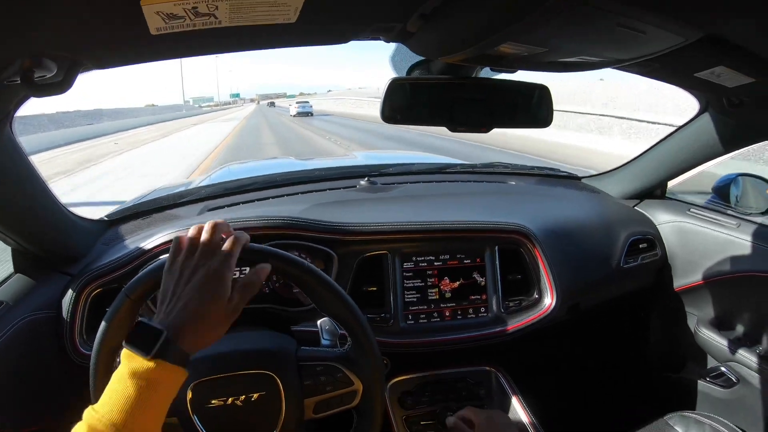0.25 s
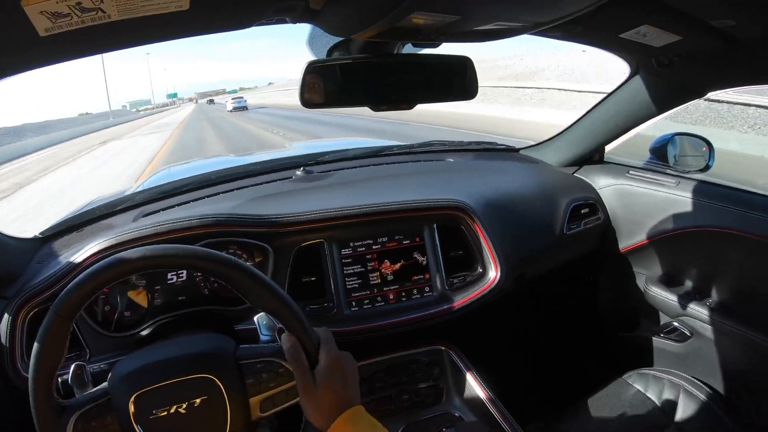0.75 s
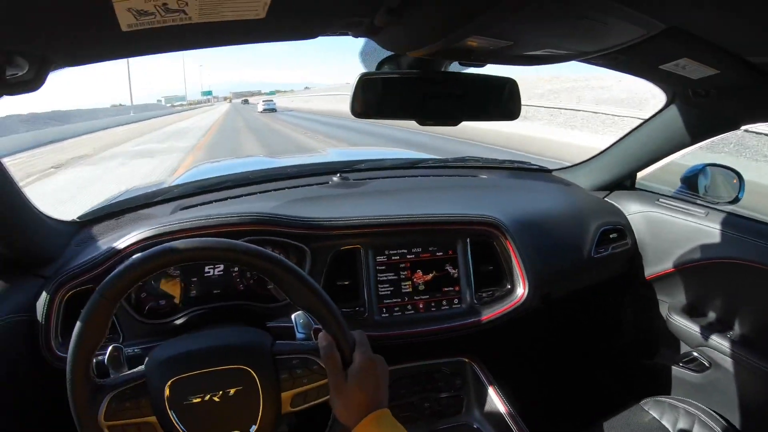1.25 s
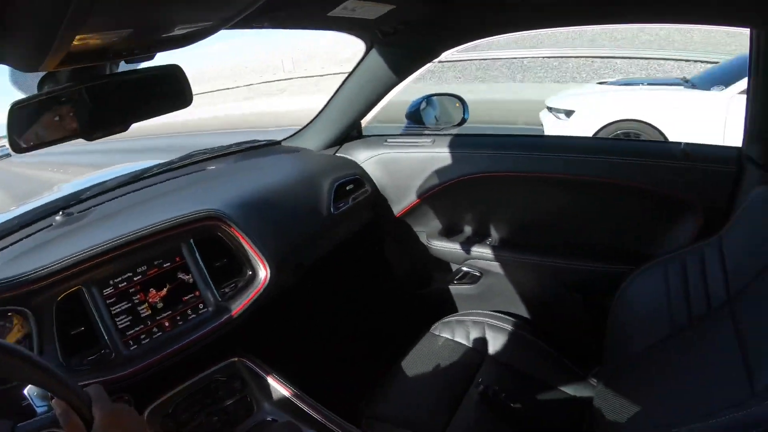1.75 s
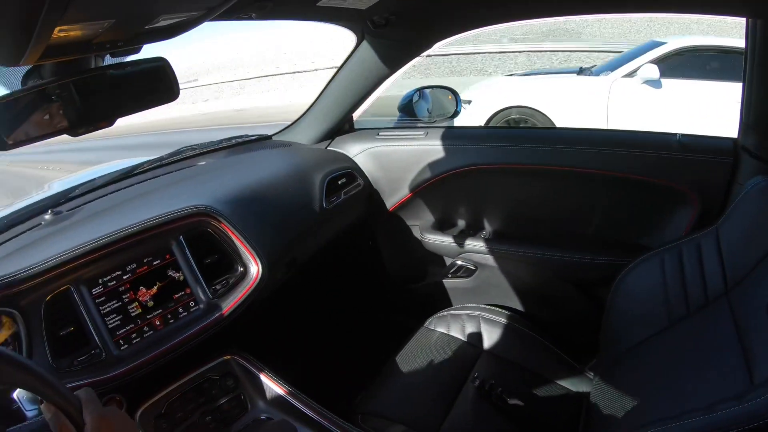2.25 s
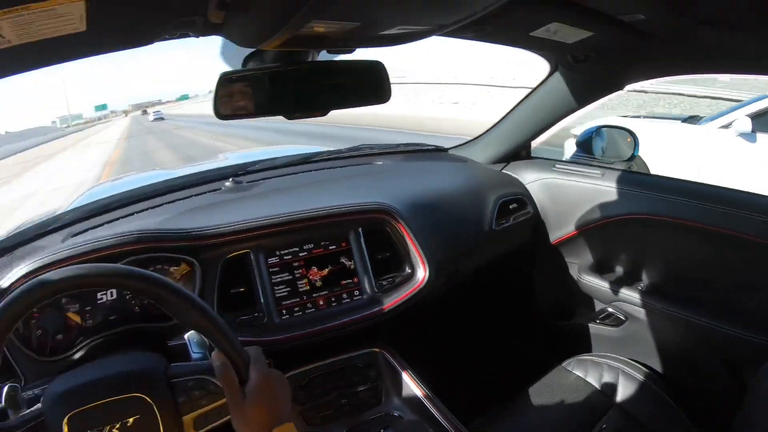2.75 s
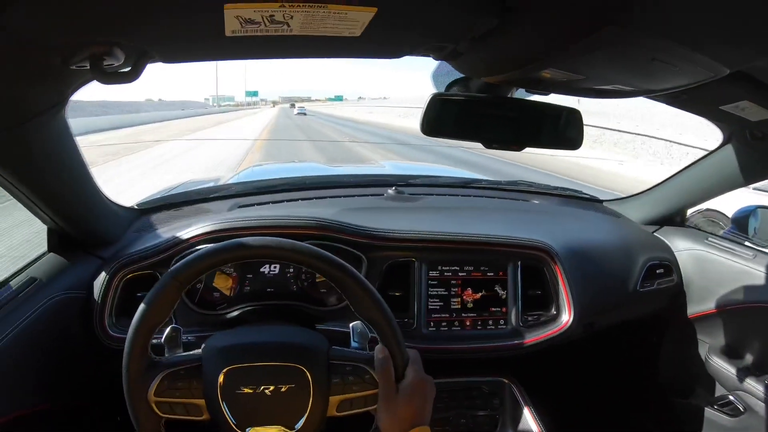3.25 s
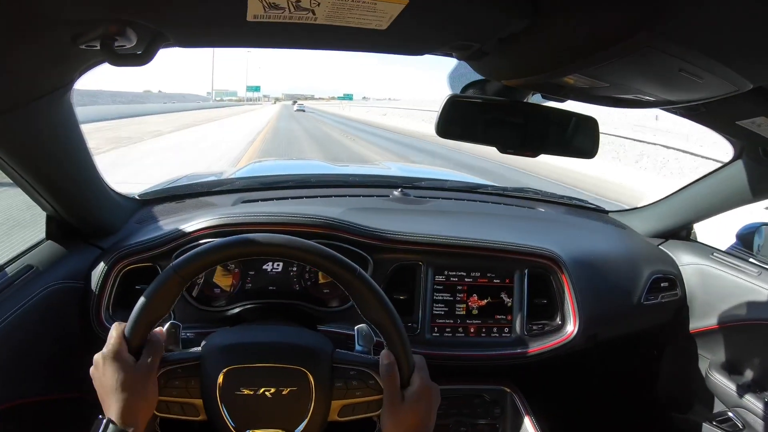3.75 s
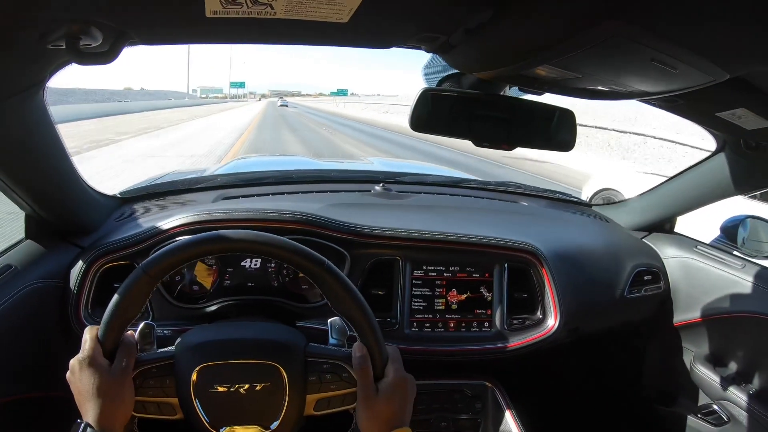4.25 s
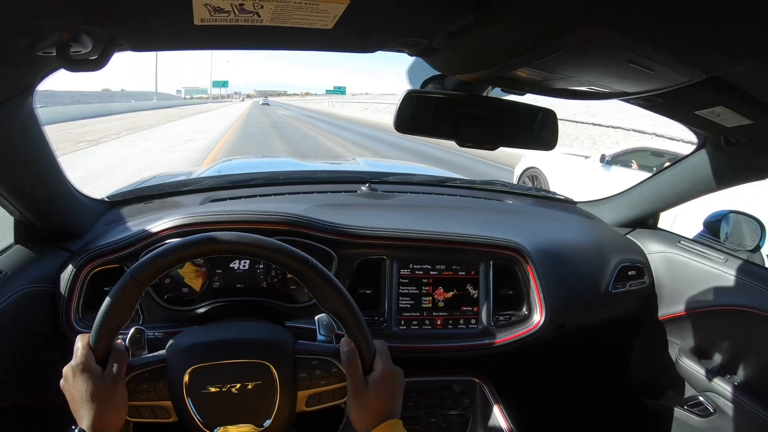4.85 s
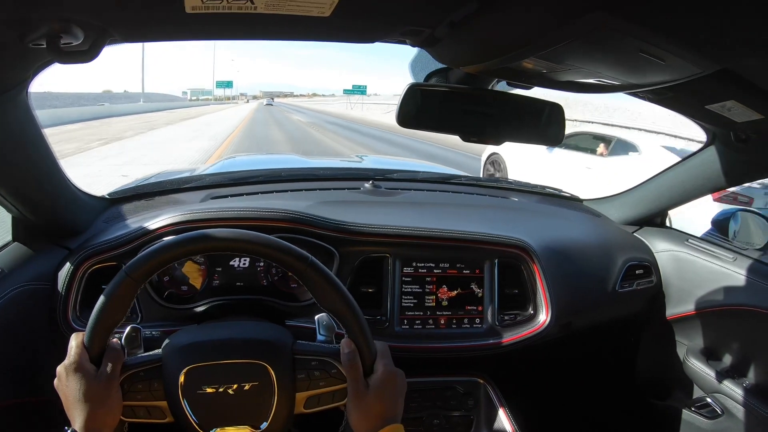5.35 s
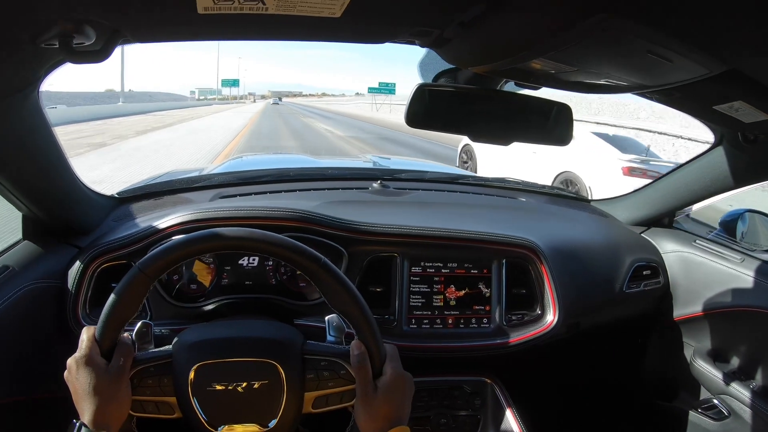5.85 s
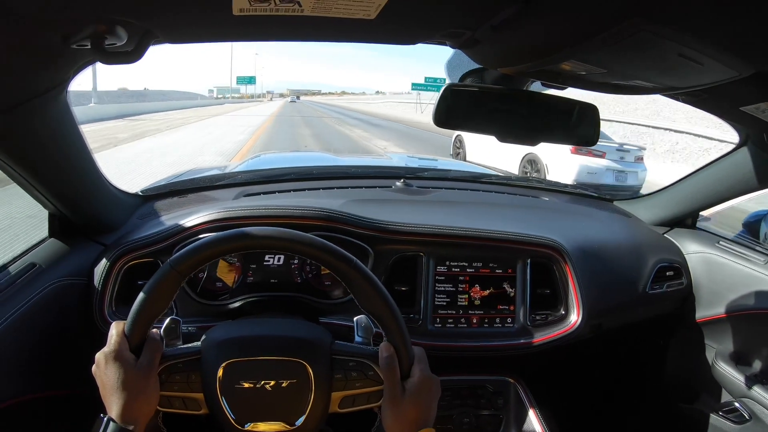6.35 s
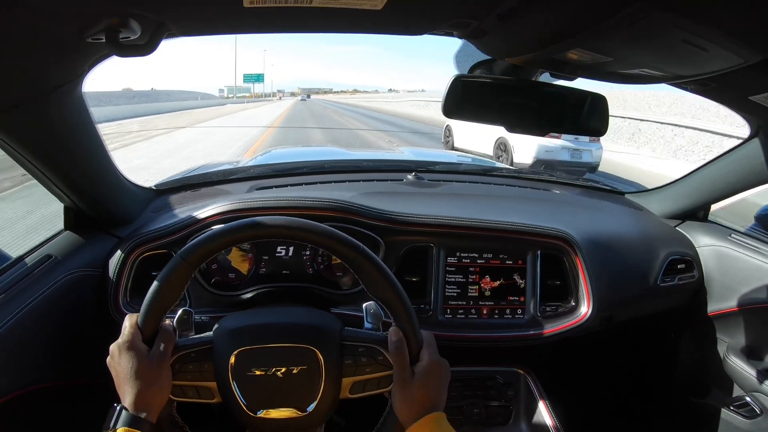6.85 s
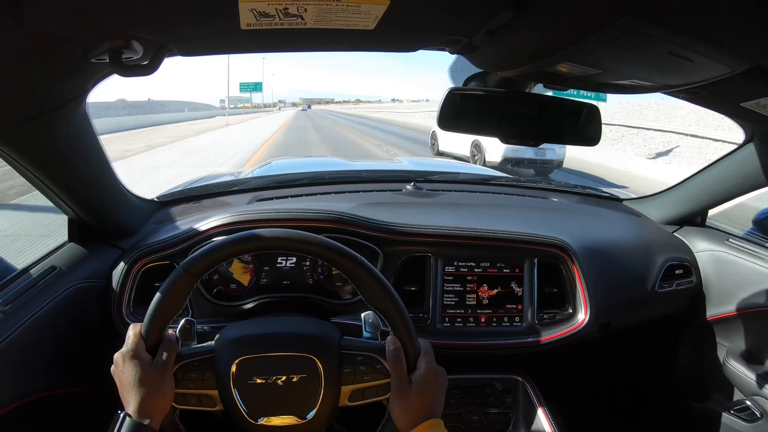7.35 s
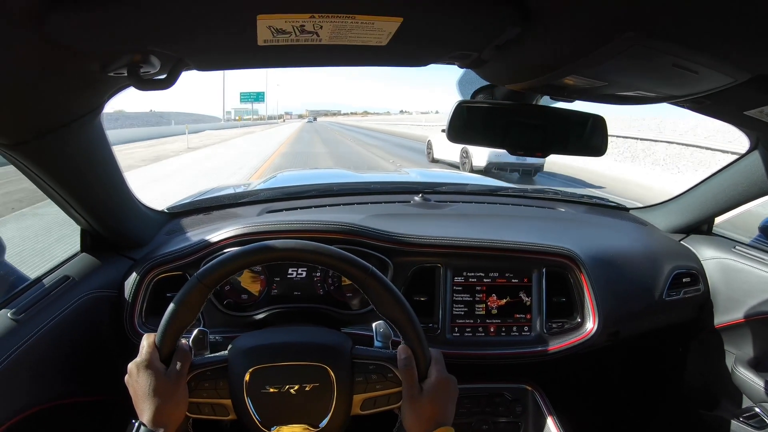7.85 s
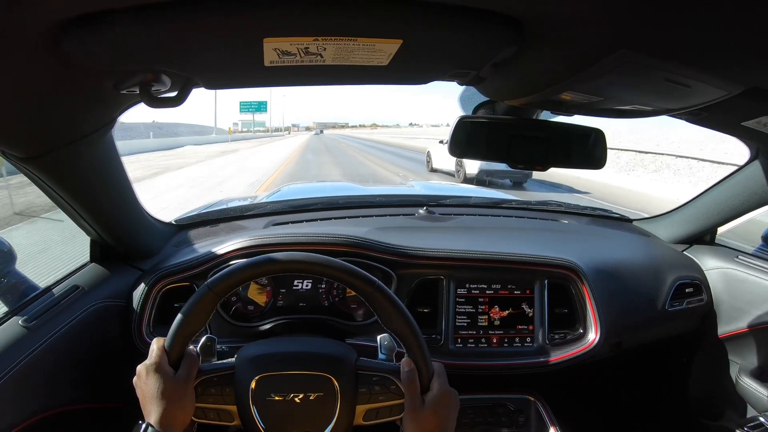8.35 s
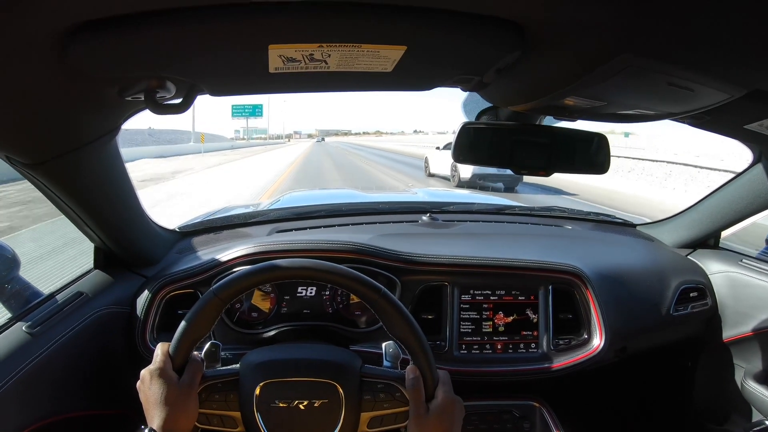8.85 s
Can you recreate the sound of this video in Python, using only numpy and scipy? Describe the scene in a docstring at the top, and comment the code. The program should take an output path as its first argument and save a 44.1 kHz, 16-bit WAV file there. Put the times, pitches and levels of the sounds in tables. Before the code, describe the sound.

Inside a V8 car cruising over road rumble, a second V8 growls past on the right, then the driver's own engine accelerates.

```python
"""Inside a closed V8 car on a highway. At first its engine coasts over road rumble and tyre roar.
A second V8 blips its throttle near 1.6 s, pulls alongside on the right and draws ahead by 6 s; its
uneven exhaust pulses growl, snarl and hiss. Then the driver's own engine kicks down a gear and
drones higher, its firing booming in the cabin. Near 8 s the other driver lifts off the throttle."""
import sys
import numpy as np
from scipy import signal
from scipy.io import wavfile
from scipy.ndimage import uniform_filter1d

SR = 44100
rng = np.random.default_rng(int(sys.argv[2]) if len(sys.argv) > 2 else 0)


def generate_wav(sig):
    """Save sig (samples, or channels by samples) to the path in sys.argv[1] as 16-bit PCM at SR."""
    pcm = np.round(np.clip(np.atleast_2d(sig).T, -1, 1) * 32767).astype(np.int16)
    wavfile.write(sys.argv[1], SR, pcm)


N = 401310
TIME = np.arange(N) / SR

# How loud the road is: (time [s], rumble [dB], body boom [dB], tyre roar [dB])
ROAD_LEVELS = [(0, -23.5, -29.5, -39), (.5, -22.5, -28, -36), (.9, -20.5, -31, -34.5),
               (1.5, -23.5, -28.5, -32), (1.8, -25, -25, -34.5), (2.1, -22, -30.5, -34.5),
               (2.7, -20, -30.5, -33), (3.4, -22, -29.5, -34), (4.0, -25, -35, -35.5),
               (4.75, -27.5, -36, -43), (5.4, -26.5, -27, -41), (6.2, -21, -38.5, -47),
               (6.8, -33.5, -37, -45), (7.5, -28, -35.5, -42.5), (7.95, -27, -33.5, -42.5),
               (8.4, -21, -29.5, -42.5), (8.65, -23, -26.5, -39.5), (9.1, -21.5, -39, -42)]
# The colour (low-to-high balance) of each road noise: (frequency [Hz], relative level [dB])
RUMBLE_COLOUR = [(9.4, -28.5), (16, 1.5), (32, 4), (59, -6), (108, -3.5), (146, -5.5), (161, -13),
                 (184, -7.5), (230, -8.5), (300, -41), (510, -120)]
BOOM_COLOUR = [(88, -31), (150, -3.5), (199, -8), (313, -12), (365, -13.5), (467, -27.5), (571, -41),
               (650, -23.5), (840, -54.5), (1430, -120)]
ROAR_COLOUR = [(330, -34.5), (560, -5.5), (640, -12.5), (834, 1), (887, 0), (983, -3.5), (1130, -7),
               (1350, -11), (1900, -16.5), (2470, -36.5), (4180, -120)]
# How alike noise is in the two ears: (frequency [Hz], likeness [-1 opposite to 1 same])
EAR_LIKENESS = [(60, 0.99), (130, 0.99), (260, 1), (550, 0.91), (1150, 0.41), (2100, 0.64), (3200, 0.97),
                (4300, 0.84), (5600, -0.16), (10500, -0.32)]
# Which ear hears more noise: (frequency [Hz], left minus right [dB])
EAR_LEAN = [(60, -0.5), (110, -0.5), (190, 1.5), (340, 0.5), (600, -2), (1060, -5.5), (1880, -3.5),
            (3330, -3.5), (5920, -4.5), (10500, -1.5)]
# How the cabin passes tones from the right: (frequency [Hz], left minus right [dB], left lead [rad])
CABIN_PATH = [(60, -0.5, 0), (250, -2, -.22), (400, 0, -.3), (500, -2, -.5), (630, -4.5, -.7),
              (800, -8, -1.8), (1000, -6, -2.7), (1160, -4, -5.0), (1350, -8, -5.7), (1700, -9, -6.1),
              (2100, -3, -5.4), (2700, -5, -6.4), (3600, -4, -5.8)]

# Our engine coasts, kicks down and pulls: (time [s], firing rate [Hz], firing tone [dB])
OWN_FIRING = [(0.0, 111.5, -23.5), (1.6, 108, -22.5), (2.3, 105.5, -29.5), (3.0, 103.9, -24),
              (3.83, 100.8, -28), (4.61, 100.6, -25), (4.91, 100.7, -20), (5.9, 102.9, -17),
              (6.08, 106.6, -17.5), (6.21, 110, -15.5), (6.33, 124.3, -15.5), (6.45, 135.1, -11.5),
              (6.82, 139.5, -11.5), (8.56, 154.7, -16.5), (8.85, 157.5, -14), (9.1, 158.2, -14.5)]
# Its side tones: (pitch [x firing rate], level coasting [dB], level pulling [dB])
OWN_SIDE_TONES = [(.5, -32, -39.5), (.75, -30.5, -34.5), (1.25, -30, -34.5), (1.5, -41.5, -40),
                  (1.75, -35, -47.5), (2, -36.5, -41.5), (3, -44, -41.5), (4, -54, -48.5)]
# Our throttle: (time [s], opening [0 to 1])
OWN_THROTTLE = [(0, 0), (4.3, 0), (6.4, 1), (9.1, 1)]

# Where the other car is: (time [s], place [0 alongside to 1 ahead])
OTHER_PLACE = [(0, 0.035), (4.4, 0), (6.2, 1), (9.1, 1)]
# Its engine speed, with eight firings in each cycle: (time [s], cycle rate [Hz])
OTHER_REVS = [(1.5, 29.6), (1.6, 33.5), (1.7, 32.3), (1.77, 34.8), (1.84, 33.3), (2.41, 32.6), (3.15, 31.2),
              (3.83, 31.2), (4.38, 31.35), (5.48, 32.7), (5.84, 33), (7, 34.1), (7.4, 36.3), (7.9, 30.4),
              (8.05, 31), (8.72, 30.6), (9.1, 31.6)]
# Its exhaust hiss, a lower rasp and a higher sizzle: (time [s], rasp [dB], sizzle [dB])
HISS_LEVELS = [(0.0, -41.5, -63.5), (0.5, -38.5, -61), (0.88, -38, -60), (1.0, -42.5, -66),
               (1.18, -43, -63.5), (1.4, -39, -58), (1.9, -42, -51), (3.1, -43, -54), (4.12, -43, -58.5),
               (4.17, -38, -50), (4.4, -38.5, -48), (4.95, -45, -45), (5.3, -42, -39.5), (5.6, -43.5, -40),
               (5.95, -34, -37.5), (6.25, -42, -42.5), (6.62, -41, -46), (6.8, -44.5, -51),
               (7.3, -45, -53.5), (8.1, -50.5, -63), (8.3, -47.5, -60.5), (9.1, -50.5, -67.5)]
# Their colours with the car alongside and ahead: (frequency [Hz], relative level [dB])
RASP_BESIDE = [(940, -34), (1600, -1.5), (1930, 0.5), (2100, -1.5), (2230, -1), (2680, -10), (2970, -9.5),
               (3900, -19), (5070, -44.5), (8580, -120)]
RASP_AHEAD = [(940, -41.5), (1600, -8), (2180, -25.5), (2460, -5), (2540, -2), (2640, -1.5), (3110, -19.5),
              (3590, -23), (3900, -17), (5070, -51.5), (8580, -120)]
SIZZLE_BESIDE = [(2060, -30.5), (3500, -1), (3760, -5.5), (3960, -2), (4300, -4), (5380, 1), (6270, 2),
                 (6790, -1), (7580, 2), (9720, -9.5), (11000, -33.5), (14200, -45.5), (22000, -120)]
SIZZLE_AHEAD = [(2060, -31.5), (3500, -5), (4300, -8), (5000, -4), (5500, 0.5), (6300, -1), (7000, -4),
                (9720, -9.5), (11000, -29), (14200, -45.5), (22000, -120)]
# Extra hiss as its driver works the throttle: (start [s], length [s], rasp [dB], sizzle [dB])
HISS_BURSTS = [(1.547, 0.27, 7.5, 6.5), (7.411, 0.529, 7.5, 11), (8.353, 0.45, 5, 9.5)]
# Thin whistles in the hiss: (frequency [Hz], width [Hz], relative level [dB])
WHISTLES = [(2621.7, 100, 1), (3190, 60, -14), (4050, 80, -14), (5454, 160, -15), (6150, 200, -16)]
# The whistles come up once the car is ahead: (time [s], level [dB])
WHISTLE_LEVEL = [(5.2, -58), (5.9, -44), (6.55, -38), (6.9, -44.5), (7.35, -46), (7.6, -37.5), (8.0, -54),
                 (8.4, -48), (8.7, -48.5), (9.1, -59)]
# Its four groups of tones, low to high: (time [s], firing [dB], growl [dB], snarl [dB], buzz [dB])
OTHER_LEVELS = [(1.42, -66, -72, -68, -75), (1.66, -23, -25.5, -41, -59), (1.8, -31, -39, -55, -58),
                (2.2, -35, -35, -55, -53), (2.92, -32, -31.5, -48, -50), (3.1, -28, -31, -42, -55),
                (3.5, -17.5, -33.5, -41.5, -57), (3.9, -18, -30.5, -34, -54),
                (4.22, -16, -24, -29.5, -42.5), (4.8, -17, -24.5, -25.5, -39),
                (5.1, -20.5, -23, -26.5, -31.5), (5.4, -21, -26, -26, -33), (5.8, -20.5, -22.5, -32, -32),
                (6.2, -27, -26, -35, -32.5), (6.5, -33, -29.5, -40, -41.5), (6.9, -40.5, -29.5, -50.5, -52),
                (7.4, -52.5, -30, -49, -53), (7.6, -34.5, -26.5, -44, -57), (7.95, -38, -37, -50, -67),
                (8.4, -40.5, -35.5, -47.5, -59), (8.66, -60.5, -37.5, -49, -59),
                (8.85, -60, -32.5, -53, -70)]
# Low tones under its firing tone: (pitch [x cycle rate], level against the firing tone [dB])
LOPE_TONES = [(2, -23.5), (4, -15), (6, -19), (7, -19.5)]
# Growl of unequal pulses: (pitch [x cycle rate], relative level alongside [dB], ahead [dB])
GROWL_TONES = [(8.98, -7, -14), (10.035, 0, -4.5), (11, -14.5, -16.5), (12.04, -5.5, -5),
               (13.07, -12, -9.5), (14.11, -6, -4.5), (15.05, -23.5, -18), (16, -11.5, -10),
               (17, -24, -15.5), (18.04, -11, -8), (19.02, -20, -15), (19.99, -12.5, -10.5),
               (20.98, -15.5, -22), (22.14, -10.5, -9), (23.23, -20.5, -18.5), (24.1, -8, -15.5)]
# Parts of its note that swell for a moment: (time [s], half length [s], frequency [Hz], boost [dB])
SWELLS = [(1.758, 0.022, 270, 16), (1.653, 0.044, 500, 10), (2.596, 0.68, 305, 9), (2.396, 0.92, 394, 10.5),
          (3.8, 0.34, 900, 9.5), (4.126, 0.25, 740, 20.5), (4.47, 0.27, 940, 6.5), (4.84, 0.14, 1390, 13),
          (4.67, 0.24, 940, 8), (5.17, 0.41, 622, 18), (5.46, 0.43, 1320, 12.5), (5.01, 0.34, 1770, 12),
          (5.7, 0.31, 1610, 18), (6.36, 0.65, 469.7, 10), (6.3, 0.32, 905, 14.5), (4.83, 0.44, 2800, 17),
          (5.15, 0.47, 3300, 9.5), (4.4, 0.36, 1900, 13.5), (4.6, 0.68, 810, 1), (6.0, 0.21, 2300, 3),
          (7.004, 0.46, 679, 12), (7.6, 0.21, 620, 15), (8.6, 0.13, 710, 11)]


def from_db(db):
    """Turn decibels into a number to multiply by."""
    return 10 ** (np.asarray(db) / 20)


def rms_one(x):
    """Scale a signal so that its average power is 1."""
    return x / np.sqrt(np.mean(x ** 2) + 1e-20)


def in_time(table, t):
    """Read each column of a table at times t."""
    times, *columns = np.transpose(table)
    return [np.interp(t, times, column) for column in columns]


def at_hz(table, hz, column=1):
    """Read a table at a frequency, with octaves evenly spaced."""
    rows = np.array(table)
    return np.interp(np.log(hz), np.log(rows[:, 0]), rows[:, column])


def drift(rate_hz, t):
    """A smooth random wobble, about 1 in size; a higher rate wobbles faster."""
    pole = np.exp(-2 * np.pi * rate_hz / 1000)
    slow = signal.lfilter([1], [1, -2 * pole, pole * pole], rng.standard_normal(12000))[2000:]
    return np.interp(t * 1000, np.arange(len(slow)), rms_one(slow))


def noise(colour, flicker_db, colour_ahead=None, ahead=0):
    """Stereo noise made of flickering third-octave bands, its overall power held near 1."""
    low_hz, high_hz = colour[0][0], colour[-1][0]
    edges = np.geomspace(low_hz, high_hz, int(3 * np.log2(high_hz / low_hz)) + 2)
    shared_flicker = drift(14, TIME)
    white = rng.standard_normal((2, 2, N))
    out = 0
    for k, (low, high) in enumerate(zip(edges, edges[1:])):
        band = signal.butter(2, [low, high], "band", fs=SR, output="sos")
        mid, side = signal.sosfilt(band, white[k % 2])
        hz = np.sqrt(low * high)
        alike, lean_db = at_hz(EAR_LIKENESS, hz), at_hz(EAR_LEAN, hz) / 2
        stereo = np.sqrt(1 + alike) * mid + np.sqrt(1 - alike) * side * [[1], [-1]]
        level_db = at_hz(colour, hz)
        if colour_ahead is not None:
            level_db = (1 - ahead) * level_db + ahead * at_hz(colour_ahead, hz)
        gain = from_db(level_db + flicker_db * (0.79 * shared_flicker + drift(14, TIME)))
        out += gain * from_db([[lean_db], [-lean_db]]) * stereo
    power = uniform_filter1d(out.mean(axis=0) ** 2, size=SR, mode="reflect")
    return out / np.sqrt(power)


def cabin_echoes(x, delay_s=(.002, .012), echo_db=-7.5):
    """Six quick echoes per ear, off glass and trim, colour a sound but keep its loudness."""
    out = x.copy()
    lags = (rng.uniform(*delay_s, size=12) * SR).astype(int)
    for k, lag in enumerate(lags):
        out[k % 2, lag:] += from_db(echo_db) * (-1) ** (k // 2) * x.mean(axis=0)[:-lag]
    return out * np.std(x) / np.std(out)


def road():
    """The floor rumbles, the body panels boom and the tyres roar through the glass."""
    rumble_db, boom_db, roar_db = in_time(ROAD_LEVELS, TIME)
    rumble = from_db(rumble_db) * noise(RUMBLE_COLOUR, flicker_db=0.2)
    boom = from_db(boom_db) * noise(BOOM_COLOUR, flicker_db=0.95)
    roar = from_db(roar_db) * cabin_echoes(noise(ROAR_COLOUR, flicker_db=0.8))
    return rumble + boom + roar


def own_engine(coast_wander=0.01197, coast_flutter_db=3):
    """Our engine's firing booms in the cabin, and uneven firing adds side tones; same in both ears."""
    firing_hz, tone_db = in_time(OWN_FIRING, TIME)
    throttle, = in_time(OWN_THROTTLE, TIME)
    coasting = np.clip(1 - 5 * throttle, 0, 1)  # with no load, pitch and level are less steady
    wander = (.002 + coast_wander * coasting) * drift(7.77, TIME)
    phase = 2 * np.pi * np.cumsum(firing_hz * (1 + wander)) / SR
    flutter_db = 0.55 * drift(15, TIME) + coast_flutter_db * coasting * drift(9.4, TIME)
    out = from_db(tone_db + flutter_db) * np.sin(phase)
    for multiple, coast_db, pull_db in OWN_SIDE_TONES:
        side_db = coast_db + throttle * (pull_db - coast_db) + 2.9 * drift(3, TIME)
        out += from_db(side_db) * np.sin(multiple * phase + rng.uniform(0, 2 * np.pi))
    return np.sqrt(2) * out


def whistles():
    """Noise rings at a few narrow pitches, making thin whistles in the other car's hiss."""
    out = 0
    for hz, width_hz, db in WHISTLES:
        pole = np.exp(-np.pi * width_hz / SR)
        ring = [1, -2 * pole * np.cos(2 * np.pi * hz / SR), pole * pole]
        rung_once = signal.lfilter([1], ring, rng.standard_normal((2, N)))
        mid, side = signal.lfilter([1], ring, rung_once)
        stereo = rms_one(mid + 1.4 * side * [[1], [-1]])
        lean_db = at_hz(EAR_LEAN, hz) / 2
        out += from_db(db + 1.1 * drift(8.3, TIME)) * from_db([[lean_db], [-lean_db]]) * stereo
    return from_db(in_time(WHISTLE_LEVEL, TIME)[0]) * out


def throttle_bursts_db(column, sag_db_per_s, rise_s=0.028, fall_s=0.045):
    """Each move of the throttle lifts the hiss quickly; it then sags and drops back."""
    out = np.zeros(N)
    for burst in HISS_BURSTS:
        start_s, length_s = burst[:2]
        age = TIME - start_s
        shape = np.clip(np.minimum(age / rise_s, (length_s - age) / fall_s), 0, 1)
        out += shape * (burst[column] - sag_db_per_s * age)
    return out


def other_exhaust_hiss(throb=0.18, bark=0.12, flicker_db=0.65):
    """The other car's hiss throbs once and twice per engine cycle and barks with each firing."""
    cycle_hz, = in_time(OTHER_REVS, TIME)
    phase = 2 * np.pi * np.cumsum(cycle_hz) / SR
    throbbing = throb * (np.cos(phase) + 0.5 * np.cos(2 * phase + 1))
    pulsing = rms_one(np.exp(throbbing + bark * np.cos(8 * phase)))
    rasp_db, sizzle_db = in_time(HISS_LEVELS, TIME)
    rasp_db += throttle_bursts_db(column=2, sag_db_per_s=7)
    sizzle_db += throttle_bursts_db(column=3, sag_db_per_s=5)
    ahead, = in_time(OTHER_PLACE, TIME)
    rasp = from_db(rasp_db) * noise(RASP_BESIDE, 1.0, RASP_AHEAD, ahead)
    sizzle = from_db(sizzle_db) * noise(SIZZLE_BESIDE, 1.1, SIZZLE_AHEAD, ahead)
    return pulsing * from_db(flicker_db * drift(7.3, TIME)) * (rasp + sizzle) + whistles()


def swells_db(t, hz):
    """The boost an exhaust tone gets when it is near a swell in both time and pitch."""
    out = 0
    for peak_s, half_s, centre_hz, db in SWELLS:
        half_width_hz = 29.6 + 0.022 * centre_hz
        out += db * np.exp(-((t - peak_s) / half_s) ** 2 - ((hz - centre_hz) / half_width_hz) ** 2)
    return out


def other_engine(waver_db=3.5, ear_slip_rad=0.68, lift_off_s=7.85, pulse_scatter=.45, pulse_lag=.009):
    """The passing V8's unequal exhaust pulses make tones at multiples (k) of its cycle rate."""
    t = np.arange(0, N + 1024, 4) / SR  # a quarter of the sample rate is enough for these tones
    slow_t = t[::32]
    cycle_hz, = in_time(OTHER_REVS, t)
    jitter = (.0012 + .006 * (t > lift_off_s)) * drift(10.36, t)  # off the throttle it runs unevenly
    cycle_phase = 2 * np.pi * np.cumsum(cycle_hz * (1 + jitter)) / (SR / 4)
    firing_db, growl_db, snarl_db, buzz_db = in_time(OTHER_LEVELS, slow_t)
    ahead, = in_time(OTHER_PLACE, slow_t)
    firing = [(8, 0)] + LOPE_TONES
    growl = [(k, beside_db + ahead * (ahead_db - beside_db)) for k, beside_db, ahead_db in GROWL_TONES]
    snarl = [(k, -.15 * k - 2.3 * (k % 2)) for k in range(25, 53)]
    buzz = [(k, -.1 * k - .6 * ahead * max(k - 86, 0)) for k in range(53, 106)]
    groups = [(firing, firing_db, False), (growl, growl_db, True),
              (snarl, snarl_db, True), (buzz, buzz_db, True)]
    out = np.zeros((2, len(t)))
    for tones, level_db, wavers in groups:
        hz = np.array([k * cycle_hz[::32] for k, _ in tones])
        tones_db = [db + waver_db * wavers * drift(1.55, slow_t) for _, db in tones]
        gains = from_db(tones_db + swells_db(slow_t, hz))
        if wavers:  # wavers and swells change this group's colour, not its loudness
            gains /= np.sqrt(np.sum(gains ** 2, axis=0))
        leans = from_db(at_hz(CABIN_PATH, hz) / 2)
        leads = at_hz(CABIN_PATH, hz, column=2) / 2
        both_ears = np.abs(leans * np.exp(1j * leads) + np.exp(-1j * leads) / leans)
        gains *= from_db(level_db) * 2 / both_ears.clip(1.3)  # boost where left and right cancel
        for (k, _), gain, lean, lead in zip(tones, gains, leans, leads):
            # The middle tones roughly line up into one slightly smeared pulse per cycle.
            scatter = rng.uniform(-np.pi, np.pi) * (pulse_scatter if 20 < k < 53 else 1)
            phase = k * cycle_phase + scatter - np.pi * pulse_lag * k ** 2
            slip = ear_slip_rad * (k > 24) * drift(1.0, slow_t)  # high tones wander between the ears
            shift = np.interp(t, slow_t, lead + slip)
            out[0] += np.interp(t, slow_t, gain * lean) * np.sin(phase + shift)
            out[1] += np.interp(t, slow_t, gain / lean) * np.sin(phase - shift)
    return np.sqrt(2) * signal.resample_poly(out, 4, 1, axis=1)[:, :N]


def scene():
    """Both engines and the exhaust hiss over the road noise."""
    return own_engine() + other_engine() + cabin_echoes(other_exhaust_hiss()) + road()


def record(dry):
    """Round off the loudest peaks and cut the highest treble."""
    rounded = 1.467 * np.tanh(dry / 1.526)
    cutoff_hz = 14750
    return signal.sosfilt(signal.cheby2(12, 70, cutoff_hz, fs=SR, output="sos"), rounded)


dry = scene()
out = record(dry)
generate_wav(out)
```